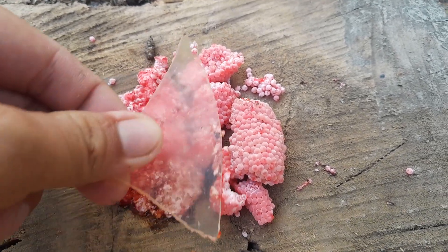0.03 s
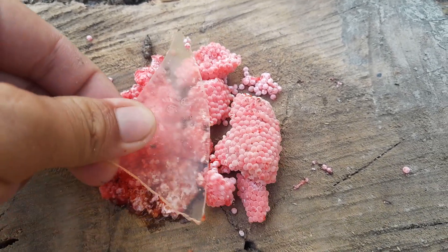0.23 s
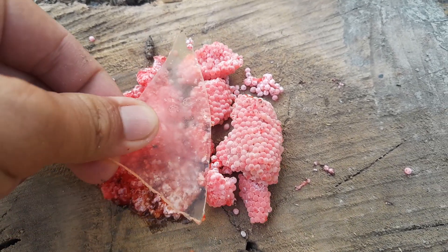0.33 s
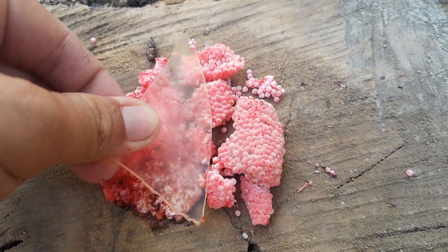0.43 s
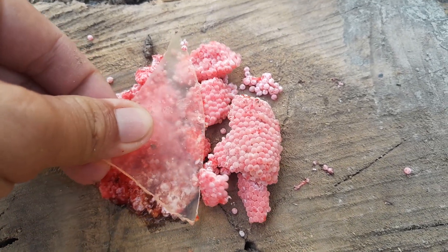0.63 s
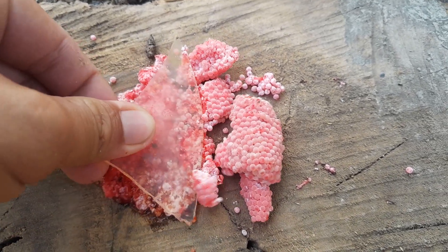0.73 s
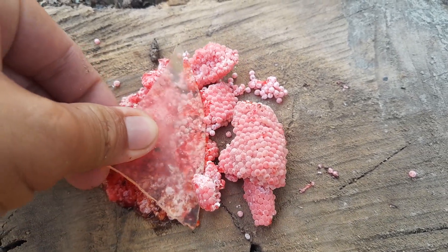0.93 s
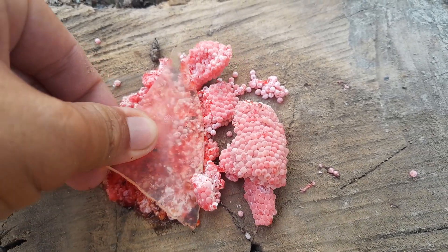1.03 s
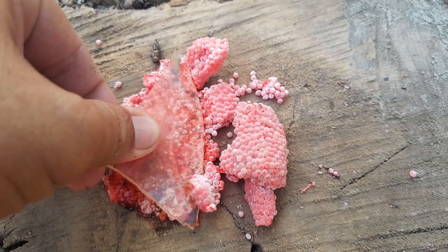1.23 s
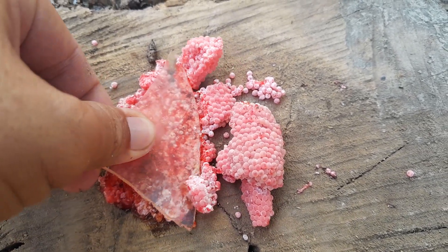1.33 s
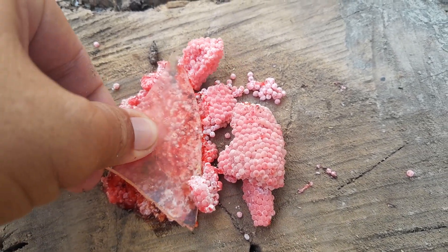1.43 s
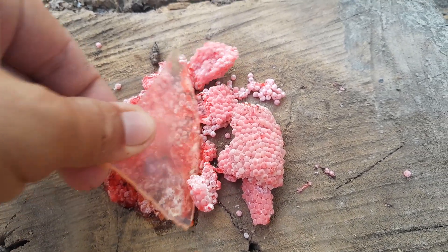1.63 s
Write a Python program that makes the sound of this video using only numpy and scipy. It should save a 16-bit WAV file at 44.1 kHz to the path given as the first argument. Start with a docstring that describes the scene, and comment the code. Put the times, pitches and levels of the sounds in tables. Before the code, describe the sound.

Small snail eggs crackle and crunch close up, crushed under a glass shard on a tree stump. Sharp little snaps begin around 0.2 seconds, each with a slight wooden knock. The densest, loudest crunches come at about 0.7 to 0.8 seconds and again just after 1 second. From 1.3 seconds the crackle thins to a few faint ticks, ending near 1.7. A quiet rumble and hiss lie underneath.

```python
"""Sharp little snaps and wet-free crunches, close up: snail eggs crushed under a shard of glass.
A thumb presses the shard onto the clusters on a tree stump. Single shells snap, whole clumps collapse
in short crunches, and a fine crackle follows the pressure. Every break rings the shard briefly and
knocks the wood; a low rumble and a faint hiss lie underneath.""" 
import sys
import numpy as np
from scipy import signal
from scipy.fft import rfft, irfft, next_fast_len
from scipy.io import wavfile
from scipy.ndimage import map_coordinates

SR = 44100
rng = np.random.default_rng(int(sys.argv[2]) if len(sys.argv) > 2 else 0)


def unload_audio(sound):
    """Save the sound as a 16-bit wav file, at the path given as the first command line argument."""
    columns = np.transpose(np.atleast_2d(sound))
    # keep every value between -1 and 1, then stretch to whole-number steps
    steps = np.round(np.clip(columns, -1, 1) * 32767)
    wavfile.write(sys.argv[1], SR, steps.astype(np.int16))


N = 74970


def eggs():
    """Every break reaches the microphone as a click, a short scatter and the ring of shard and stump."""
    # tone of a fracture at the two microphone ports: freq_hz, left_db, right_db
    fracture_eq = [(200, -47, -53), (407, -32.5, -39), (660, -7.5, -11), (1200, -12.5, -11),
                   (2100, -17, -14), (2685, -5, -4.5), (4020, -4.5, -3.5), (4700, -6, -6), (5600, 1, -6.5),
                   (6700, 1.5, -3), (7700, -0.5, -29), (8580, -17.5, -17.5), (11350, -15, -13.5),
                   (11420, -10, -10.5), (16100, -18, -19), (16300, -25, -66)]
    force, knock = snaps() + crunches() + crackle()
    direct = amp([[-1], [-24.5]]) * force  # the right port faces away
    diffuse = amp([[-5], [-2]]) * scatter(force, t60_s=0.011, rise_s=0.00011)
    echo = amp(-18) * scatter(force, t60_s=0.062, rise_s=0.024)  # nearby surfaces answer faintly
    sound = coloured(direct + diffuse + echo, fracture_eq) + shard(force) + stump(knock)
    lag_s = np.array([[0], [0.0003007]])  # the right side arrives a touch later
    return filtered(sound, lambda hz: np.exp(-2j * np.pi * hz * lag_s))


def snaps(boost_db=8.5, knock_db=-21.5):
    """Single shells burst with a sharp tick. Returns the force on the shard and on the wood."""
    # one burst shell a row: start_s, level_db (before the boost), pitch_hz
    bursts = [(0.0912, -33.5, 5330), (0.1709, -34, 6000), (0.188, -30, 6700), (0.2019, -25.5, 5900),
              (0.2116, -25.5, 5940), (0.2293, -15.5, 5600), (0.255, -27, 5600), (0.2746, -15, 3580),
              (0.2987, -29, 3470), (0.3359, -25, 8800), (0.366, -24.5, 4030), (0.3777, -13.5, 3360),
              (0.3791, -17, 5160), (0.3906, -24, 7500), (0.4109, -13.5, 3780), (0.4155, -45, 6700),
              (0.4249, -15.5, 7200), (0.4518, -29, 2500), (0.479, -19, 7640), (0.5394, -24, 3370),
              (0.5449, -17, 7200), (0.5649, -20, 3880), (0.5772, -27, 7500), (0.598, -31, 3100),
              (0.6063, -23.5, 5060), (0.6185, -22, 4400), (0.6717, -21.5, 6900), (0.6778, -19, 7300),
              (0.6819, -16.5, 8100), (0.6859, -13.5, 3800), (0.689, -16, 3570), (0.7003, -13, 7060),
              (0.7135, -14.5, 7040), (0.732, -19, 7640), (0.7355, -24, 6900), (0.744, -22, 8400),
              (0.7632, -20, 3540), (0.768, -11, 2270), (0.7744, -13, 8300), (0.7872, -14, 2340),
              (0.802, -24, 8300), (0.8064, -23, 6400), (0.8152, -21.5, 2380), (0.8302, -29, 4800),
              (0.8618, -14, 2460), (0.892, -17, 8400), (0.9387, -15.5, 2520), (0.9759, -20.5, 4700),
              (0.9887, -32, 6200), (1.0022, -23, 4700), (1.0249, -15, 7500), (1.0369, -17, 2980),
              (1.0394, -18.5, 4100), (1.0479, -8, 7700), (1.05, -14.5, 7700), (1.0569, -11, 2430),
              (1.0602, -21, 8000), (1.0695, -11, 7700), (1.0784, -13.5, 2580), (1.1036, -16, 5800),
              (1.1178, -23, 6300), (1.161, -28, 6350), (1.1696, -23, 4330), (1.1782, -20, 5740),
              (1.2049, -28, 3140), (1.2732, -20.5, 5900), (1.3106, -19.5, 4070), (1.492, -39.5, 3560),
              (1.6726, -35, 3570)]
    force = np.zeros(N)
    for start_s, level_db, pitch_hz in bursts:
        tick = shell([amp(level_db + boost_db)], pitch_hz, ring_db=-13.5, t60_s=0.0022)
        force[round(start_s * SR):][:len(tick)] += tick
    return np.array([force, amp(knock_db) * force])


def crunches(boost_db=2, attack_s=0.0015, release_s=0.0023):
    """A clump gives way in a dense burst of like-pitched breaks and drops the shard towards the wood."""
    # collapsing clumps: start_s, hold_s, level_db (before the boost), knock_db (wood over shard), pitch_hz
    clumps = [(.09, 0.0052, -40.5, 7.5, 5430), (0.2107, 0.0043, -37, 9, 6100),
              (0.2231, 0.0054, -30.5, -0.5, 5600), (0.252, 0.0047, -43.5, 2, 6000),
              (0.376, 0.0061, -34.5, 8.5, 3660), (0.411, 0.0097, -38.5, 4, 6800),
              (0.495, 0.025, -46, 3.5, 6360), (0.5436, 0.01, -42, 3.5, 7100),
              (0.56, .006, -39.5, 3.5, 4040), (0.608, 0.011, -43.5, 3.5, 4400),
              (.684, 0.014, -33.5, 1.5, 6900), (.698, 0.0086, -28, -0.5, 7100),
              (0.7113, 0.0029, -28.5, -4, 6900), (0.7661, 0.012, -27, 5, 2800),
              (0.781, 0.0088, -33, 4, 6850), (0.969, 0.012, -41.5, 5.5, 4700), (1.047, 0.023, -38, 0, 5800),
              (1.101, 0.0036, -33, -2, 5730), (1.285, 0.008, -51, 12.5, 5860), (1.49, 0.015, -57, -1, 5400),
              (1.674, 0.006, -62, -11, 3380)]
    t = np.arange(N) / SR
    force = np.zeros((2, N))  # on the shard, on the wood
    breaks = amp(boost_db) * fractures(per_s=6500, spread_db=2.5)
    for start_s, hold_s, level_db, knock_db, pitch_hz in clumps:
        attack = np.clip((t - start_s) / attack_s, 0, 1)
        release = np.exp(-np.maximum(t - start_s - hold_s, 0) / release_s)
        crunch = shell(attack * release * breaks, pitch_hz, ring_db=-17, t60_s=0.0041)[:N]
        force += amp([[level_db], [level_db + knock_db]]) * crunch
    return force


def crackle(boost_db=3, spurt_db=4, spurts_per_s=90):
    """Shell fragments keep breaking in little spurts under the thumb, driving both shard and wood."""
    # crackle of the crushed mass: time_s, level_db (before the boost), knock_db (wood over shard)
    envelope = [(0, -64.5, -2), (.13, -57.5, 9.5), (.19, -58, 11), (.24, -45.5, 3), (.31, -49.5, 3),
                (.355, -60.5, 12), (.43, -48, 8), (.465, -59, 9), (.52, -44.5, -0.5), (.58, -47.5, 2),
                (.655, -49.5, 0), (.69, -50, -5), (.73, -39, -3.5), (.795, -37.5, 11), (.85, -54, 5),
                (.925, -57.5, 7), (.955, -41.5, -2), (1.01, -42.5, -10), (1.06, -46.5, 1), (1.125, -39, -5),
                (1.19, -47.5, -1.5), (1.25, -52.5, -4.5), (1.315, -50.5, 3.5), (1.38, -56.5, -10),
                (1.7, -62, -14)]
    level_db, knock_db = curves(envelope)
    wander = map_coordinates(rng.standard_normal(N // 50), [np.arange(N) * spurts_per_s / SR])
    spurts = amp(spurt_db * np.tanh(wander))
    breaks = unit(spurts * fractures(per_s=1400, spread_db=5))
    return amp(boost_db + np.array([level_db, level_db + knock_db])) * breaks


def fractures(per_s, spread_db):
    """A spray of tiny breaks, random in time and size, at rms 1."""
    sizes = amp(spread_db * np.clip(rng.standard_normal(N), -2, 2))
    polarity = rng.choice([-1, 1], N)
    return unit(sizes * polarity * (rng.random(N) < per_s / SR))


def shell(pulses, pitch_hz, ring_db, t60_s):
    """Each impulse trails a few cycles at the pitch of the breaking shell."""
    t = np.arange(SR // 100) / SR
    ping = amp(ring_db - 60 * t / t60_s) * np.cos(2 * np.pi * pitch_hz * t)
    return signal.fftconvolve(pulses, (t == 0) + ping)


def shard(force):
    """The glass answers each break with a brief, bright ring."""
    # modes of the shard: pitch_hz, t60_s, left_db, right_db
    glass_modes = [(2335, 0.045, -65, -46.5), (3190, 0.0083, -47.5, -37.5), (4005, 0.07, -44, -56),
                   (5310, 0.023, -34, -32), (5930, 0.013, -42, -48), (6400, 0.0097, -86, -90),
                   (6900, 0.012, -71, -69)]
    return ring(force, glass_modes)


def stump(knock, pressed_s=0.796, crossfade_s=0.12):
    """The wood knocks with no bass; its modes shift as the shard is pressed flat."""
    # modes of the stump at first: pitch_hz, t60_s, left_db, right_db
    wood_modes = [(498, 0.07, -47, -52), (614, 0.082, -41, -56), (686, 0.07, -41.5, -50),
                  (753, 0.048, -42.5, -49.5), (820, 0.065, -57.5, -58), (902, 0.061, -50.5, -54),
                  (1206, 0.038, -47.5, -51), (1502, 0.039, -50.5, -44.5), (1830, 0.059, -46, -53)]
    # modes of the stump with the shard pressed flat: pitch_hz, t60_s, left_db, right_db
    pressed_modes = [(671, 0.074, -47.5, -73), (782, 0.077, -42.5, -55.5), (930, 0.037, -44, -75),
                     (1152, 0.055, -38.5, -42.5), (1437, 0.023, -56, -38.5)]
    pressed = np.clip((np.arange(N) / SR - pressed_s) / crossfade_s + .5, 0, 1)
    sound = ring(knock * (1 - pressed), wood_modes) + ring(knock * pressed, pressed_modes)
    bass_cut = signal.butter(10, 448, "high", fs=SR, output="sos")
    return signal.sosfilt(bass_cut, sound)


def ring(force, modes):
    """Damped modes struck by the force, as heard left and right."""
    t = np.arange(SR // 8) / SR
    response = sum(amp([[left_db], [right_db]]) * amp(-60 * t / t60_s) * np.sin(2 * np.pi * hz * t)
                   for hz, t60_s, left_db, right_db in modes)
    return signal.fftconvolve(force[None], response, axes=1)[:, :N]


def scatter(force, t60_s, rise_s, spots=6):
    """The breaks are spread over several spots, each with its own short, diffuse stereo tail."""
    t = np.arange(SR // 10) / SR
    tails = rng.standard_normal((spots, 2, len(t))) * amp(-60 * t / t60_s) * (1 - np.exp(-t / rise_s))
    tails /= np.linalg.norm(tails, axis=2, keepdims=True)
    spot = rng.integers(spots, size=N)
    return sum(signal.fftconvolve((force * (spot == k))[None], tails[k], axes=1)[:, :N]
               for k in range(spots))


def rumble(width_db=-13):
    """A low, nearly mono bed that swells and sinks, leaning slightly left."""
    # swell of the rumble: time_s, level_db (before panning)
    swell = [(0, -61), (.1, -54), (.16, -54.5), (.28, -51.5), (.35, -57), (.52, -60), (.64, -54.5),
             (.77, -52), (.85, -57.5), (.97, -59.5), (1.04, -52), (1.15, -55), (1.24, -50.5), (1.31, -52.5),
             (1.385, -52), (1.42, -60), (1.6, -61), (1.7, -58)]
    # tone of the rumble: freq_hz, gain_db
    rumble_eq = [(15, -43), (28, -41), (48, -3), (68, 2), (88, -6.5), (106, -0.5), (130, -8), (175, -15.5),
                 (290, -15), (400, -24.5), (600, -55.5)]
    level_db, = curves(swell)
    noise = rng.standard_normal(N) + amp(width_db) * rng.standard_normal((2, N))
    return unit(coloured(noise, rumble_eq)) * amp(level_db) * amp([[1.5], [-0.5]])


def hiss():
    """A faint, steady hiss, unrelated between left and right."""
    # tone of the hiss: freq_hz, left_db, right_db
    hiss_eq = [(200, 11, -18), (440, 0.5, 1), (850, -12.5, -11), (1600, -27, -5.5), (2160, -1, 1.5),
               (2800, -34, 6.5), (4170, -29.5, 3.5), (6300, -10.5, 7), (7500, -70, -6.5),
               (8450, -48, -23.5), (11900, -44, -10), (14800, -28, -11)]
    return amp(-57) * coloured(rng.standard_normal((2, N)), hiss_eq)


def amp(db):
    """Decibels to gain."""
    return 10 ** (np.asarray(db) / 20)


def unit(x):
    """Scale to rms 1."""
    return x / np.sqrt(np.mean(x ** 2) + 1e-20)


def curves(rows):
    """Breakpoints to envelopes, one for each column after time_s."""
    time_s, *columns = np.transpose(rows)
    return [np.interp(np.arange(N) / SR, time_s, column) for column in columns]


def filtered(x, response):
    """Shape the spectrum with a gain given as a function of frequency."""
    size = next_fast_len(N + 8192)
    return irfft(rfft(x, size) * response(np.fft.rfftfreq(size, 1 / SR)), size)[..., :N]


def coloured(x, eq):
    """EQ through points on a log frequency axis: freq_hz, then gain_db for each channel."""
    freq_hz, *channels = np.transpose(eq)
    log_freq = np.log(freq_hz + 1)
    return filtered(x, lambda hz: amp([np.interp(np.log(hz + 1), log_freq, db) for db in channels]))


def scene():
    """The crushing up front, over a quiet bed of rumble and hiss."""
    return eggs() + rumble() + hiss()


def record(dry, top_hz=16100):
    """A steep high cut takes off the very top of the treble."""
    return filtered(dry, lambda hz: 1 / (1 + (hz / top_hz) ** 120))


dry = scene()
out = record(dry)
unload_audio(out)
```